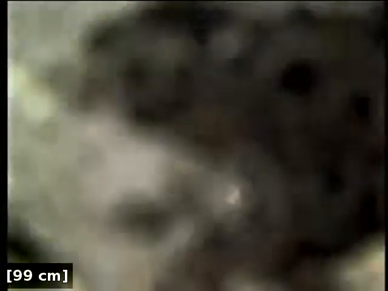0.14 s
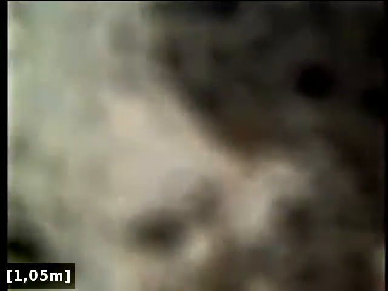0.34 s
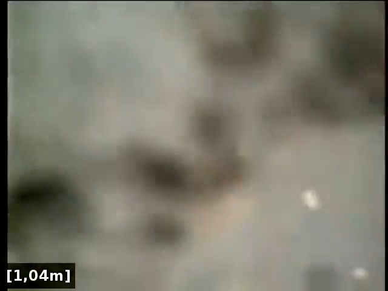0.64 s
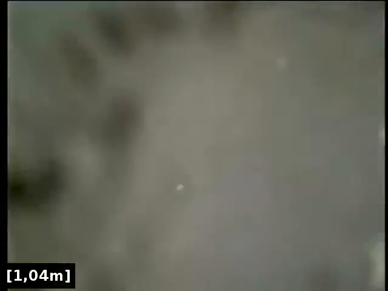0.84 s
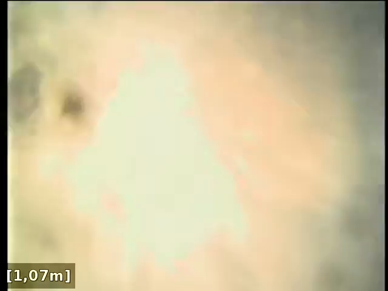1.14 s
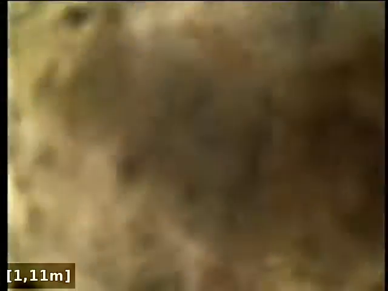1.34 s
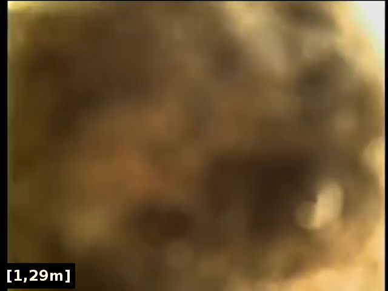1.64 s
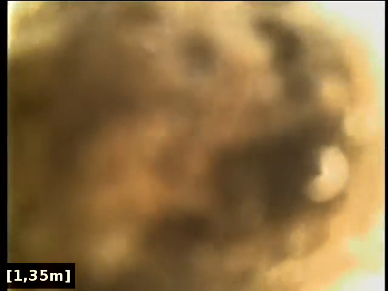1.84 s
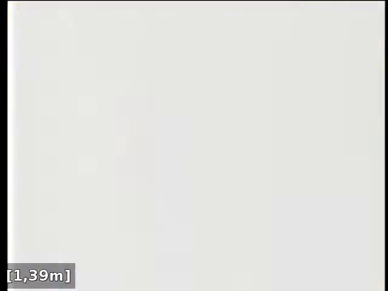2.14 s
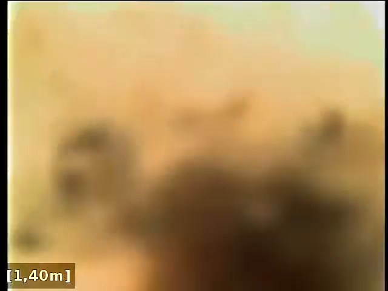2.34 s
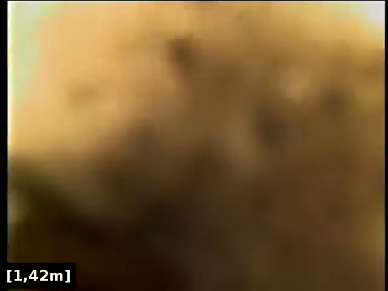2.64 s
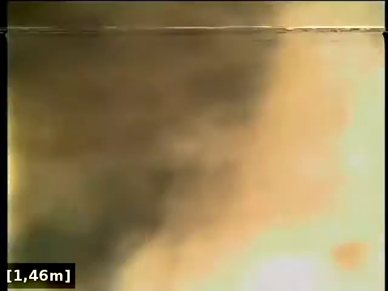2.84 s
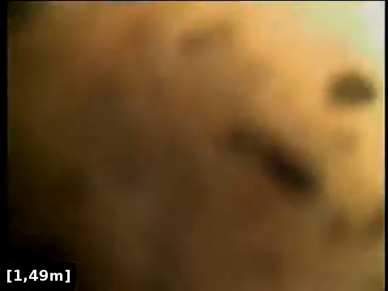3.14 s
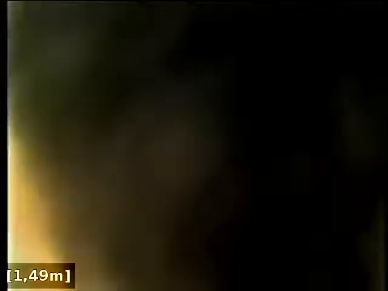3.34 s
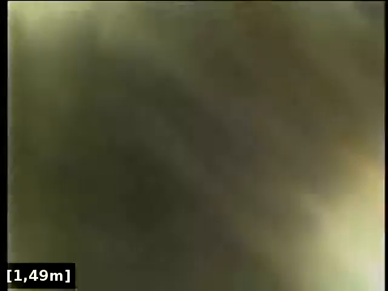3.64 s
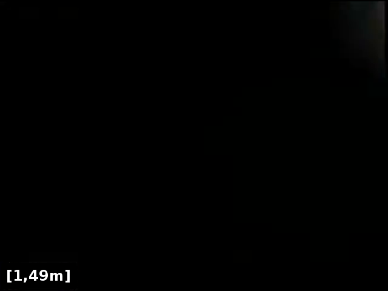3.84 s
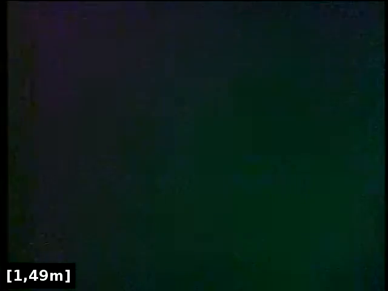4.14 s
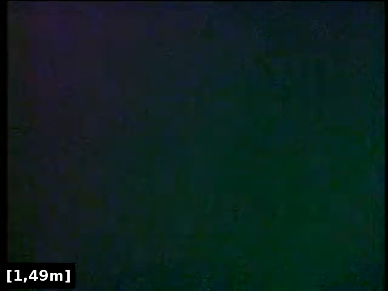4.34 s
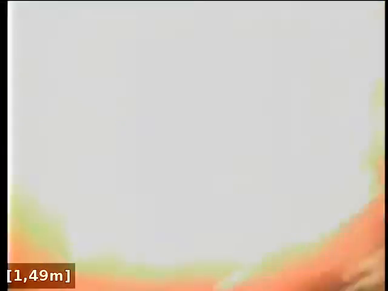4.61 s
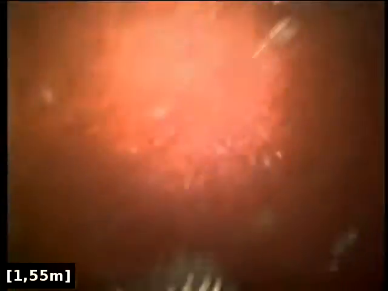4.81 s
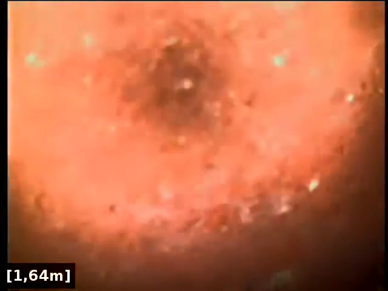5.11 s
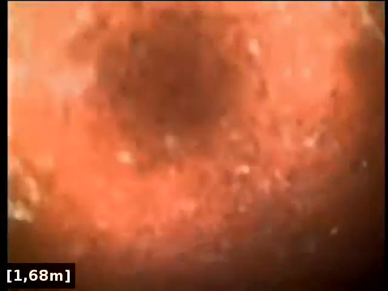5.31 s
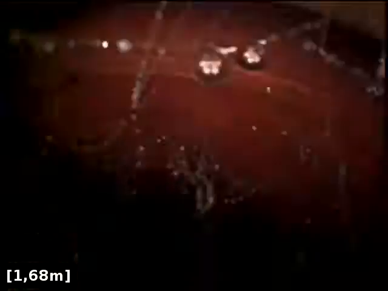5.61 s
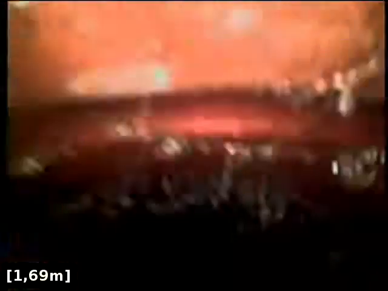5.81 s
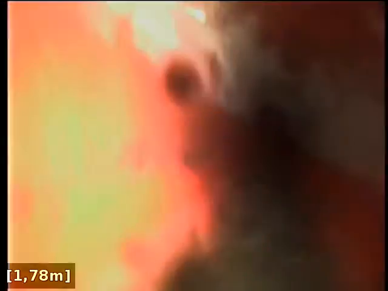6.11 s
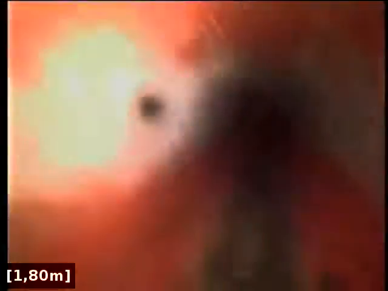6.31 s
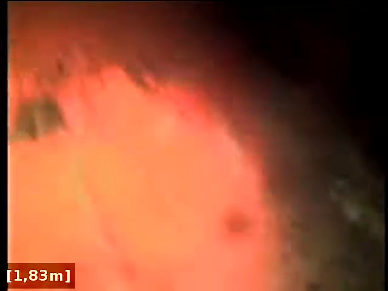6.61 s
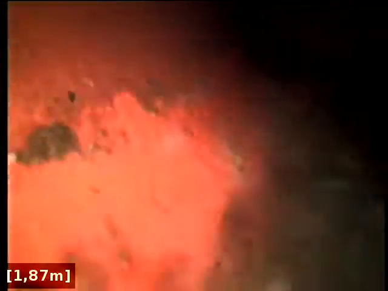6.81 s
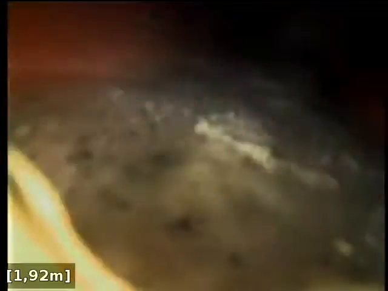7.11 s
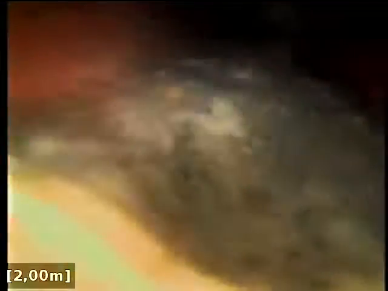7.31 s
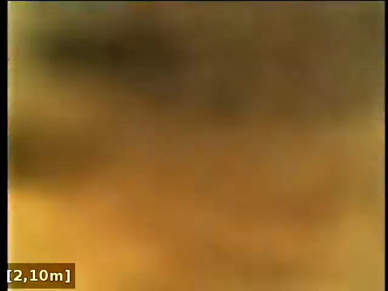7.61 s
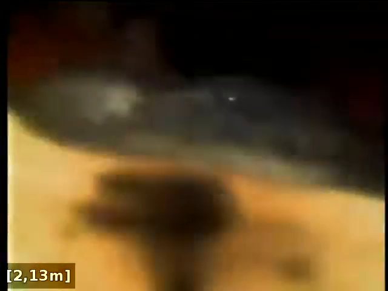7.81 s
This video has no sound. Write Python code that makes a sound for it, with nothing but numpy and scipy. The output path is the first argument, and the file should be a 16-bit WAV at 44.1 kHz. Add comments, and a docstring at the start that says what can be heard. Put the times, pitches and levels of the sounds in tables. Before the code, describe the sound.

Inside a narrow pipe, a stiff rod drags in short uneven shoves, its scraping hollow and ringing, with fine grit hissing underneath. Light ticks lead to a cluster of loud woody clonks and brief tonal hoots, then rougher, near-continuous rubbing with clicks and low judders. Sound cuts out completely once for an instant. Steady quiet low hum behind; small lo-fi microphone, muffled treble, short pipe echoes.

```python
"""A low hum and the first faint scrape open the scene: a push-rod inspection camera is fed along a drain pipe.
Each shove drags the rod along the wall: streams of tiny catches ring the pipe, with grit hissing underneath.
Knocks are a tap and a rattle of rebounds through the pipe's modes and echoes, split into five registers.
Now and then the rod sticks and slips in a short hoot or judder, made of a wavering sine and its octave.
The sound is narrow-band with a dip in the treble, and cuts out once, briefly."""
import sys
import numpy as np
from scipy import signal
from scipy.fft import rfft, irfft
from scipy.io import wavfile
from scipy.ndimage import uniform_filter1d

SR = 44100
rng = np.random.default_rng(int(sys.argv[2]) if len(sys.argv) > 2 else 0)


def dump_mix(stems):
    """Bounce the given channels to the path in sys.argv[1] as a 16-bit WAV at rate SR."""
    frames = np.atleast_2d(stems).T  # one column per channel
    limited = np.clip(frames, -1, 1)  # hard clip at full scale
    pcm = np.round(limited * 32767).astype(np.int16)
    wavfile.write(sys.argv[1], SR, pcm)


N = 350595
TIME = np.arange(N) / SR


def amp(db):
    """Decibels to a linear factor."""
    return 10 ** (np.asarray(db) / 20)


def unit(x):
    """Scale to an rms of 1."""
    return x / np.sqrt(np.mean(x ** 2) + 1e-20)


def read(points, hz):
    """Straight lines on a log-frequency axis."""
    f, value = np.transpose(points)
    return np.interp(np.log(hz + 1), np.log(f + 1), value)


def add(mix, s, sound):
    """Mix a sound in at s seconds, cut off at the end of the mix."""
    part = mix[max(round(s * SR), 0):][:len(sound)]
    part += sound[:len(part)]


def colour(x, points, size=4096):
    """Causal (minimum-phase) filter with the given spectrum."""
    hz = abs(np.fft.fftfreq(size, 1 / SR))
    log_gain = np.log(amp(read(points, hz)))
    taps = np.fft.ifft(np.exp(np.conj(signal.hilbert(log_gain)))).real
    return signal.oaconvolve(x, taps[:size // 2])[:len(x)]


def wander(size, rate):
    """Smooth random curve of rms 1, changing about `rate` times a second."""
    hz = np.fft.rfftfreq(size, 1 / SR)
    spectrum = rfft(rng.standard_normal(size))
    return unit(irfft(spectrum / (1 + (hz / rate) ** 4), size))


# Colour of the hum. Each row: frequency in Hz, relative level in dB.
HUM_COLOUR = [(25, -18), (50, -17.5), (80, -4), (100, 0.5), (130, -5.5), (190, -16.5), (300, -17.5),
              (390, -11), (600, -18.5), (780, -16.5), (1500, -27.5), (2800, -42), (4500, -41), (7300, -34),
              (8700, -56)]


def hum(db=-54.5, waver_db=-1.5):
    """Coloured noise gives a low, noisy hum with a faint hiss on top, nearly steady in level."""
    noise = unit(colour(rng.standard_normal(N), HUM_COLOUR))
    return amp(db) * noise * amp(waver_db * wander(N, 3.9))


# What rod and pipe ring with. Each row: mode in Hz, level in dB before each spot's own spread,
# time to fall by 60 dB in seconds.
PIPE_MODES = [(84.6, -18.5, 0.97), (114.75, -1.5, 1), (134.3, -1, 0.21), (148, -7, .36), (227.7, 4.5, 0.51),
              (291.5, -3, 0.23), (328, -6, 0.028), (387.8, -1.5, 0.39), (455.7, -9.5, 0.14),
              (503, -7, 0.11), (721, 6.5, 0.095), (776.5, 12, 0.14), (830.3, 4, 0.13), (1053.4, 11, 0.044),
              (1122, -0.5, 0.2), (1244, 1, 0.12), (1573, 12.5, 0.064), (2085, 0, 0.23), (2533, -0.5, 0.17),
              (3250, -9, 0.27), (3345, 5.5, 0.19), (4450, -2, 0.27), (7220, 5, 0.15)]
# Scattered echoes in the pipe. Each row: frequency in Hz, time to fall by 60 dB in seconds.
ECHO_DECAY = [(100, 0.094), (400, 0.19), (1000, 0.069), (2500, 0.11), (7000, 0.063)]


def pipe(direct, echo_db, early_db, spread_db, detune, early_s=0.0023):
    """Answer of rod and pipe to a tap at one spot: the tap itself, the modes, and scattered echoes."""
    t = np.arange(SR // 2) / SR
    hz, db, t60 = np.transpose(PIPE_MODES)[:, :, None]
    # every spot excites the modes a little differently
    spot, shift = rng.standard_normal((2, len(hz), 1))
    sign = rng.choice([-1, 1], hz.shape)
    decay = amp(db + spread_db * spot - 60 * t / t60)
    ring = (sign * decay * np.sin(2 * np.pi * hz * (1 + detune * shift) * t)).sum(0)
    # noise whose bands each die away at their own pace
    f, when, z = signal.stft(rng.standard_normal(len(t)), SR, nperseg=256)
    fading = z * amp(-60 * when / read(ECHO_DECAY, f)[:, None])
    echoes = signal.istft(fading, SR, nperseg=256)[1][:len(t)]
    # the first echoes, from along the rod itself, are the strongest
    answer = ring + amp(echo_db) * echoes * (1 + amp(early_db) * np.exp(-t / early_s))
    answer[0] += direct
    return answer


def rub(points, grains_per_s, smooth, lumpy_db, lump_rate, swings_per_s=3):
    """Friction: a stream of tiny catches, in uneven clumps, rings the pipe from a spot that keeps moving."""
    catches = rng.standard_normal(N) * (rng.random(N) < grains_per_s / SR)
    steady = smooth * rng.standard_normal(N)
    force = (unit(catches) + steady) * amp(lumpy_db * wander(N, lump_rate))
    # the contact swings between two spots and back
    turn, out = np.pi * swings_per_s * TIME, np.zeros(N)
    for share in (np.cos(turn), np.sin(turn)):
        answer = pipe(direct=227, echo_db=20.5, early_db=-3.5, spread_db=2, detune=0.0019)
        out += signal.oaconvolve(force * abs(share), answer)[:N]
    return unit(colour(out, points))


def speed(start, push, length, coast_s=0.057):
    """Speed of the rod in one shove, 0-1: push, hold, then coast to rest with a time constant."""
    age = TIME - start
    return np.clip(age / push, 0, 1) * np.exp(-np.maximum(age - length, 0) / coast_s)


# Shoves of the rod. Each row: start in seconds, time to reach full speed in seconds,
# time from start to coasting in seconds, drag in dB and grit in dB, both before the layer trims.
ROD_SHOVES = [(0.0, .01, 0.25, -54, -78), (0.667, 0.041, 0.16, -59, -62), (0.974, 0.14, 0.26, -46.5, -57),
              (1.72, 0.084, 0.32, -51, -64.5), (2.05, 0.05, 0.17, -52.5, -70),
              (2.245, 0.047, .18, -43, -65), (2.718, 0.036, 0.035, -44.5, -55),
              (2.883, 0.035, 0.28, -49.5, -59), (3.236, 0.047, 0.27, -40.5, -56.5),
              (3.54, 0.074, 0.4, -46, -55), (4.083, .04, 0.075, -56.5, -56),
              (4.221, .15, 0.22, -36.5, -51.5), (4.532, 0.025, 0.11, -42, -54),
              (4.686, 0.075, 0.17, -43, -54.5), (4.94, 0.033, 0.057, -41, -47.5),
              (5.082, .04, 0.036, -39, -47.5), (5.24, 0.045, .07, -60, -57), (5.325, 0.09, .1, -38, -51),
              (5.492, 0.091, 0.16, -36.5, -51.5), (5.757, 0.024, 0.37, -45.5, -56.5),
              (6.13, 0.051, 0.075, -44, -50.5), (6.257, 0.039, 0.11, -41.5, -52),
              (6.637, .03, 0.073, -63, -55.5), (6.745, 0.048, 0.092, -53.5, -56.5),
              (6.867, 0.073, 0.2, -45, -62), (7.14, 0.033, 0.048, -50, -55.5),
              (7.232, 0.063, 0.52, -44.5, -61.5), (7.535, 0.08, .16, -40, -50.5),
              (7.749, .05, 0.18, -50, -57.5)]
# Colour of the dragging rod. Each row: frequency in Hz, relative level in dB.
DRAG_COLOUR = [(40, -22.5), (85, -2.5), (135, -0.5), (190, -12), (330, 4.5), (500, 2.5), (610, -10),
               (780, 2), (920, -0.5), (1100, -3.5), (1500, -13.5), (2500, -19.5), (5000, -63)]
# Colour of the grit. Each row: frequency in Hz, relative level in dB.
GRIT_COLOUR = [(300, -18), (1000, -7), (1500, -2), (2100, 1), (2650, -1), (3400, -14), (4600, -17),
               (7300, -18), (8700, -37)]


def scrape(drag_trim_db=0.54, hiss_trim_db=0.0, crumb_trim_db=-11, grit_power=1.05):
    """The rod drags along the wall with each shove; with its speed, grit hisses and coarse crumbs click."""
    drag, grit = amp(-62.5), amp(-71)  # the rod never lies quite still
    for start, push, length, drag_db, grit_db in ROD_SHOVES:
        moving = speed(start, push, length)
        drag = np.maximum(drag, moving * amp(drag_db))
        grit = np.maximum(grit, moving ** grit_power * amp(grit_db))
    body = rub(DRAG_COLOUR, grains_per_s=1200, smooth=0.62, lumpy_db=1, lump_rate=23) * amp(drag_trim_db)
    hiss = rub(GRIT_COLOUR, grains_per_s=3600, smooth=0.53, lumpy_db=2.3, lump_rate=29) * amp(hiss_trim_db)
    crumbs = rub(GRIT_COLOUR, grains_per_s=64, smooth=0, lumpy_db=-1.0, lump_rate=21) * amp(crumb_trim_db)
    return body * drag + (hiss + crumbs) * grit


# Borders between thud, boom, clonk, clack and tick. Each entry: frequency in Hz.
REGISTER_BORDERS = [260, 600, 1400, 4000]


def register(x, index):
    """Band-pass for one of the five registers, thud to tick."""
    edges = np.clip([20, *REGISTER_BORDERS, SR / 3], 10, SR / 2 - 1)
    band = signal.butter(4, edges[index:index + 2], "band", fs=SR, output="sos")
    return signal.sosfilt(band, x)


# Knocks of the rod. Each row: start in seconds, strength in dB before the register levels,
# weight behind it in dB, hardness of the contact in dB, rattle time scale in seconds,
# pitch that the struck spot favours in Hz.
ROD_KNOCKS = [(.59, -55, 4, -17, 0.0078, 1600), (.664, -38.5, -17, -24, 0.0011, 805),
              (.769, -42.5, -10, -25, 0.0024, 800), (.954, -46, -14, -27, 0.0018, 830),
              (1.186, -59.5, 17.5, 1, 0.019, 115), (1.217, -34.5, -1.5, -9, 0.019, 770),
              (1.331, -48.5, 4.5, -7, 0.017, 780), (1.409, -47, 4.5, -3, 0.0069, 396),
              (1.645, -46.5, 1, -8, 0.012, 750), (1.812, -46, 1.5, 4.5, .006, 316),
              (1.87, -50.5, 8, -7, 0.0049, 332), (1.907, -38.5, -9, -10, 0.0072, 990),
              (2.031, -45, -0.5, -1.5, 0.0033, 1650), (2.243, -44, 2, -2, 0.0026, 416),
              (2.36, -34, -3, -0.5, .01, 797), (2.575, -49, 6.5, 1, 0.0057, 296),
              (2.764, -38, -3.5, -5.5, 0.0063, 840), (2.819, -35.5, -2, -8.5, 0.0025, 805),
              (2.839, -53, 2, -19, 0.0014, 790), (2.949, -31.5, -3, -16, 0.0048, 730),
              (3.003, -28, -2.5, 3.5, 0.025, 790), (3.067, -30.5, -4.5, 8, 0.013, 824),
              (3.077, -39, 7, 9.5, 0.0064, 367), (3.183, -38.5, 3.5, -6, 0.003, 412),
              (3.203, -37.5, -4, 5, .007, 1560), (3.214, -32.5, 2, 3, 0.0075, 794),
              (3.338, -23.5, -4, -2, 0.0097, 770), (3.403, -33, 4, 3.5, 0.0068, 790),
              (3.44, -57.5, 21, -15, 0.0021, 393), (3.543, -37.5, 4.5, 10.5, 0.0075, 1606),
              (3.657, -33.5, 3.5, -9, 0.0053, 750), (3.673, -31.5, 0.5, -1, 0.014, 400),
              (3.708, -32.5, 3, -5.5, 0.012, 770), (3.74, -35.5, 3, -14.5, 0.065, 390),
              (4.377, -36.5, 1.5, -13, 0.0067, 414), (4.45, -38.5, -12, -1.5, 0.023, 1200),
              (4.517, -36, -1, -16, 0.0039, 740), (4.536, -35, 1, -5, 0.021, 760),
              (4.57, -41, 6.5, 13, .011, 307), (4.634, -40.5, -1.5, 0, 0.002, 410),
              (4.686, -29, -12, -8, 0.0063, 890), (4.758, -36, 4, 9, 0.0097, 2010),
              (4.788, -40, 0, 6.5, 0.014, 406), (4.958, -32.5, 1.5, 1, .016, 389),
              (4.974, -32.5, -6, -2.5, 0.027, 777), (5.097, -36, 4.5, -15, .005, 352),
              (5.14, -37, 3, 5.5, 0.0067, 2090), (5.42, -41.5, 3, 2.5, 0.009, 358),
              (5.565, -41, -3, -17, 0.011, 810), (5.784, -40.5, -0.5, 13, 0.0081, 2030),
              (5.852, -34.5, -6, -1.5, 0.004, 766), (5.878, -43, 1.5, 3, 0.0023, 790),
              (5.924, -30, 3.5, 3.5, 0.025, 410), (5.963, -36.5, -6, 3, 0.008, 760),
              (5.998, -44, 3, 5.5, .0055, 1540), (6.041, -24.5, -33, -28.5, 0.0012, 904),
              (6.078, -38, 2, 11.5, 0.0054, 2040), (6.31, -40.5, -7, -13, 0.018, 770),
              (6.424, -50, 7, 9, 0.0062, 302), (6.467, -38, 5, 1, 0.0036, 342),
              (6.696, -44.5, -4, -13, 0.0029, 1340), (7.095, -42, 6, 10.5, 0.01, 1600),
              (7.352, -31, 3.5, 10, 0.0072, 2560), (7.467, -41, 2, -28, 0.0083, 394),
              (7.625, -36, -5, 1, 0.021, 1800), (7.659, -31.5, -1, 11.5, 0.0056, 1800)]
# How the registers, thud to tick, answer. Each row: level in a plain knock in dB,
# dB per dB of weight, dB per dB of hardness.
REGISTER_TOUCH = [(-9.5, 1.42, 0.42), (-5.5, 1.21, -0.06), (-1.35, 0, 0), (-12, 0, 0.9648),
                  (-29.5, -0.5, 1.29)]
# Colour of a contact. Each row: frequency in Hz, relative level in dB.
CONTACT_COLOUR = [(40, -26.5), (75, -13), (112, -1.5), (150, 1), (198, -21.5), (335, 1), (500, 1),
                  (620, -13), (820, -0.5), (1400, -7), (2600, -1), (3400, -20), (7400, -12), (8700, -37)]


def knocks(first_tap=0.64, rebound=0.44, rebounds_per_s=2800, ping_db=55.0, ping_q=12):
    """A tap and a short rattle of rebounds; weight brings out low registers, a hard contact high ones."""
    out, t = np.zeros(N), np.arange(SR // 16) / SR
    lags = (0.0037, 0, 0, 0, 0)  # s; the thud takes a moment to build
    fades = (np.inf, np.inf, np.inf, 0.081, 0.061)  # time constants in s; the treble fades along the blow
    spots = []
    for _ in range(11):
        answer = pipe(direct=115, echo_db=14.5, early_db=8.5, spread_db=3, detune=0.0037)
        spots.append(colour(answer, CONTACT_COLOUR))
    for i, (s, strength_db, weight_db, hard_db, rattle, hz) in enumerate(ROD_KNOCKS):
        age = t / rattle
        # the rebounds swell as the rod digs in, then die away
        swell = 7 * age * np.exp(-2.5 * age)
        hits = rng.standard_normal(len(t)) * (rng.random(len(t)) < rebounds_per_s / SR)
        force = rebound * hits * swell
        force[0] = first_tap
        blow = signal.fftconvolve(force, spots[i % len(spots)])
        # the struck spot answers at once with a short ping of its own pitch
        ping = signal.lfilter(*signal.iirpeak(hz, ping_q, SR), force)
        add(blow, 0, amp(ping_db + read(CONTACT_COLOUR, hz)) * ping)
        for k, (plain_db, by_weight, by_hardness) in enumerate(REGISTER_TOUCH):
            part = register(blow, index=k) * np.exp(-TIME[:len(blow)] / fades[k])
            # each register is levelled by its loudest 20 ms
            power = uniform_filter1d(part[:SR // 8] ** 2, SR // 50, mode="constant")
            loudest = np.sqrt(power.max())
            level_db = strength_db + plain_db + by_weight * weight_db + by_hardness * hard_db
            add(out, s + lags[k], part * amp(level_db) / loudest)
    return out


# Stick-slip, a hoot on the upper modes or a judder on the lowest. Each row: start in seconds,
# length of the push in seconds, centre pitch in Hz, level in dB before the swell and flutter.
ROD_STICK_SLIP = [(2.281, 0.0073, 395, -33), (2.359, 0.018, 783, -28), (2.837, 0.0052, 784, -31),
                  (3.010, 0.024, 811, -24), (3.022, 0.02, 393, -27), (3.336, 0.0092, 769, -26),
                  (3.653, 0.067, 768, -33.5), (3.708, 0.032, 769.6, -28.5), (3.751, 0.016, 377, -28),
                  (3.785, 0.032, 394, -23.5), (3.813, 0.032, 388.6, -18.5), (4.677, 0.014, 773, -28),
                  (4.704, 0.0093, 930, -38.5), (5.78, 0.11, 118, -42.5), (5.934, 0.0077, 392, -32.5),
                  (5.975, 0.071, 114.6, -34.5), (6.11, 0.032, 121.1, -40)]


def hoots(octave_db=-22, ring_db=-10.5, ring_cycles=190, build_cycles=3.2, waver=0.004, flutter_db=2.5):
    """The rod sticks and slips in step with a pipe mode, which builds up over a few cycles and rings on."""
    out, t = np.zeros(N), np.arange(SR // 2) / SR
    for s, length, hz, db in ROD_STICK_SLIP:
        push = signal.windows.tukey(int(length * SR), 0.29)  # soft-edged
        near = signal.fftconvolve(push, np.exp(-t * hz / build_cycles))[:len(t)]
        # the ring falls by 60 dB in ring_cycles
        ring = signal.fftconvolve(push, amp(-60 * t * hz / ring_cycles))[:len(t)]
        near, ring = near / near.max(), ring / ring.max()
        swell = np.hypot(near * amp(flutter_db * wander(len(t), 50)), amp(ring_db) * ring)
        pitch = hz * (1 + waver * near * wander(len(t), 60))
        phase = 2 * np.pi * np.cumsum(pitch) / SR
        tone = np.sin(phase) + amp(octave_db) * np.sin(2 * phase)
        add(out, s, amp(db) * np.sqrt(2) * swell * tone)
    return out


def scene():
    """Knocks, scrape, hoots and hum together, as one channel."""
    return (knocks() + scrape() + hoots() + hum())[None]


# The brief silence. The row: start in seconds, end in seconds.
CUT_OUT = (4.8297, 4.9575)


def record(dry, notch_hz=3990, notch_width_hz=260, notch_db=-24, edge_hz=8850):
    """A narrow-band recorder: a dip in the treble, one cut-out, and a steep low-pass at edge_hz."""
    hz = np.fft.rfftfreq(N, 1 / SR)
    dip_db = notch_db * np.exp(-((hz - notch_hz) / notch_width_hz) ** 2)
    dipped = irfft(rfft(dry) * amp(dip_db), N)
    live = (TIME < CUT_OUT[0]) | (TIME > CUT_OUT[1])
    low_pass = signal.firwin(511, edge_hz, window=("kaiser", 9), fs=SR)
    return signal.oaconvolve(dipped * live, low_pass[None], "same")


dry = scene()
out = record(dry)
dump_mix(out)
```